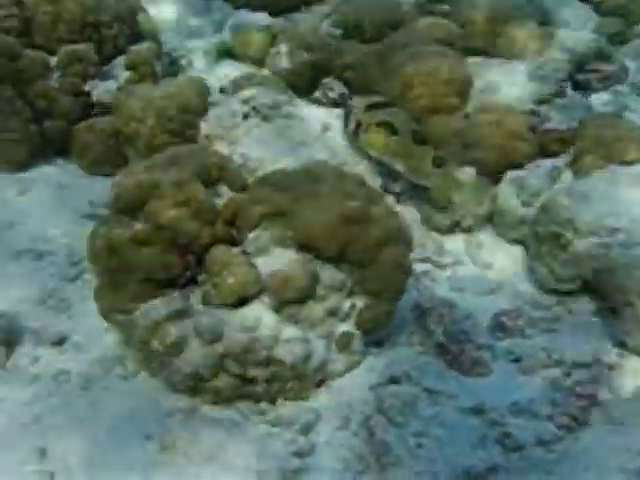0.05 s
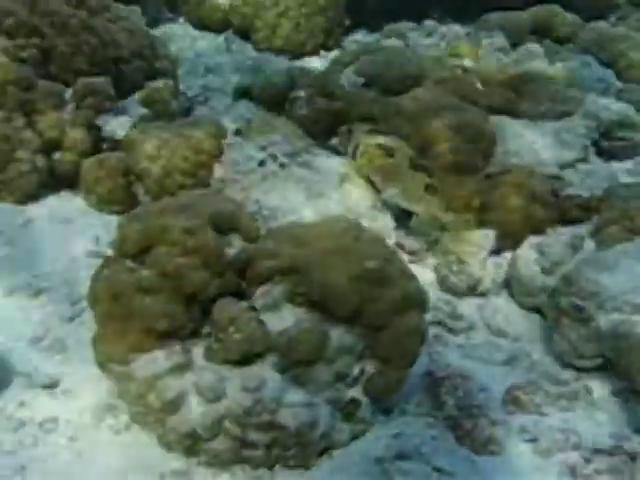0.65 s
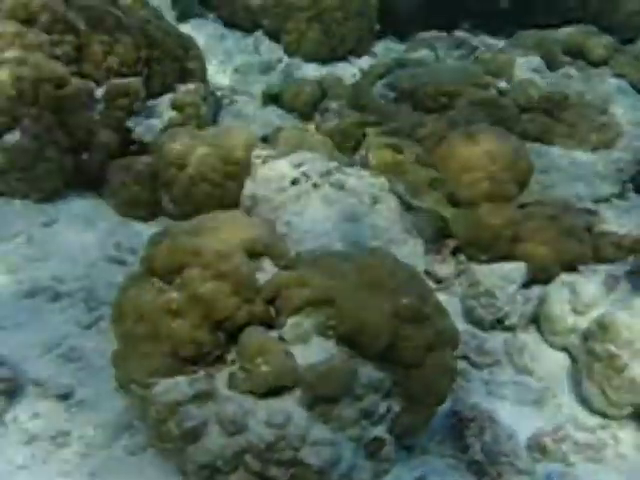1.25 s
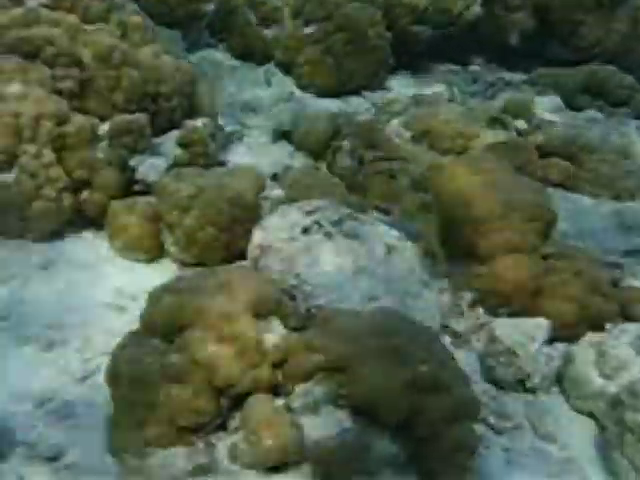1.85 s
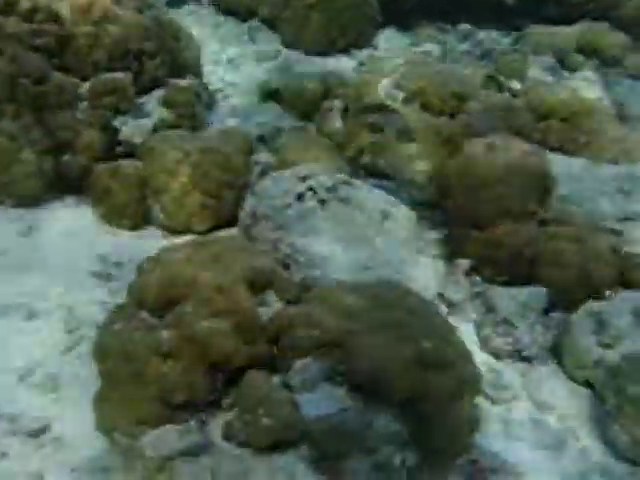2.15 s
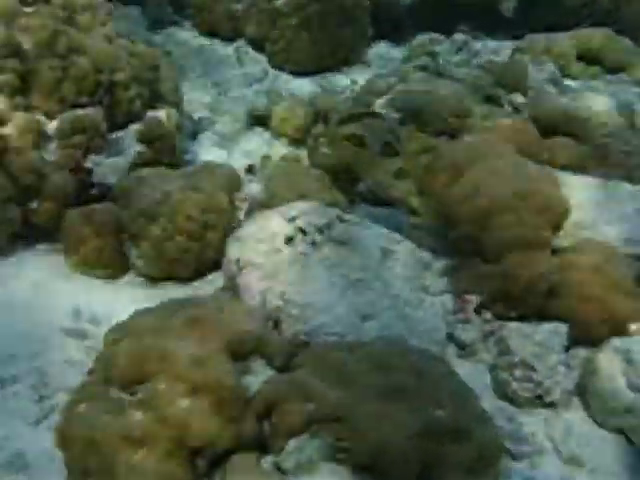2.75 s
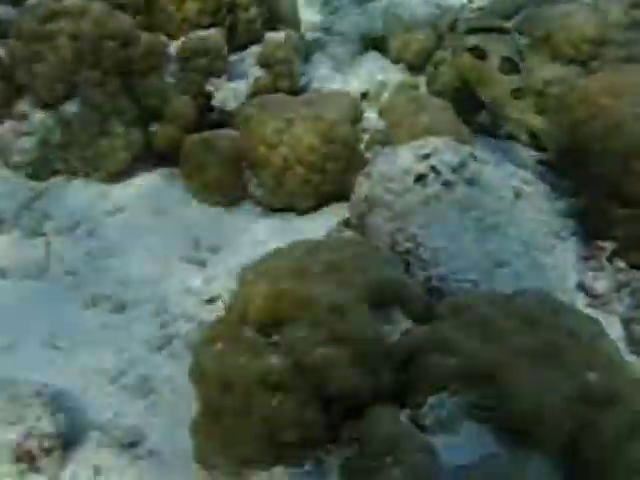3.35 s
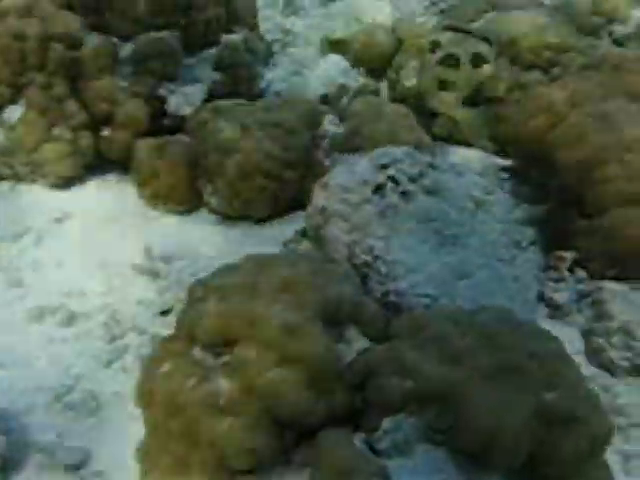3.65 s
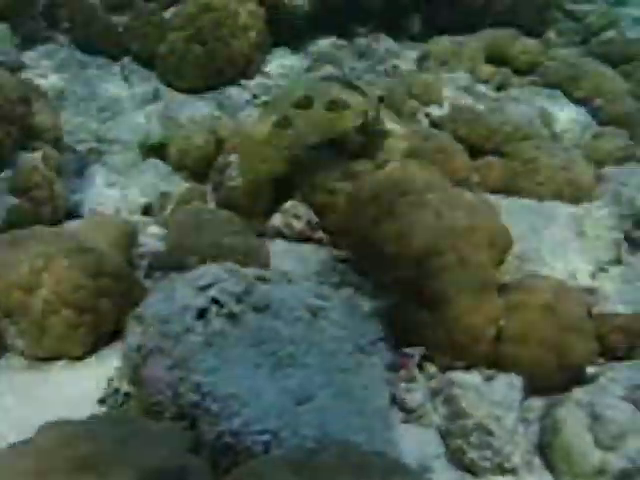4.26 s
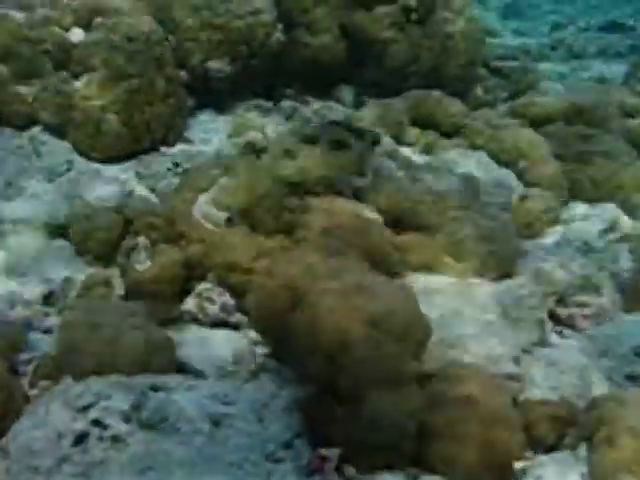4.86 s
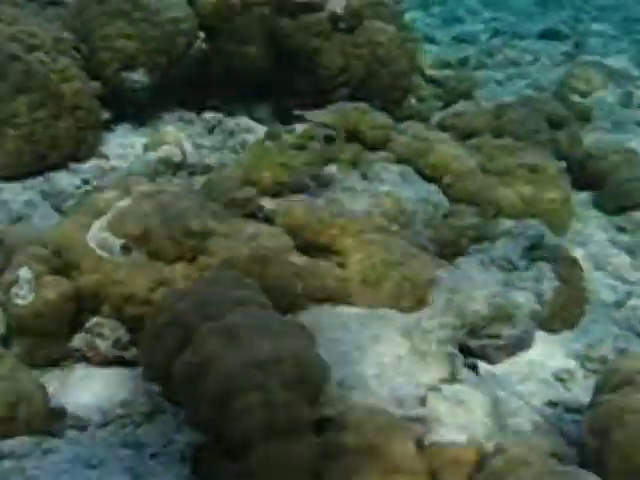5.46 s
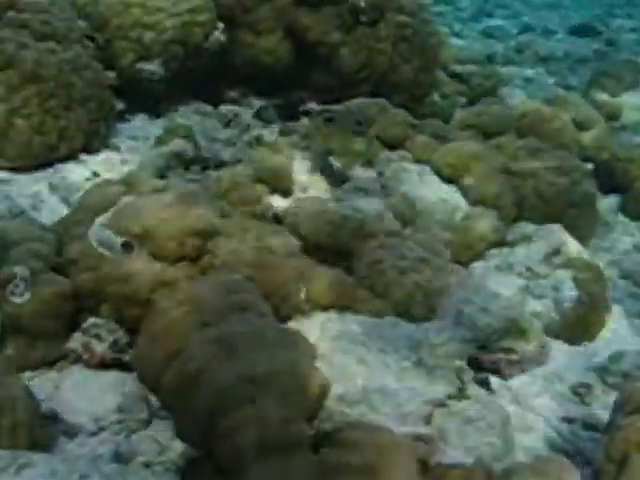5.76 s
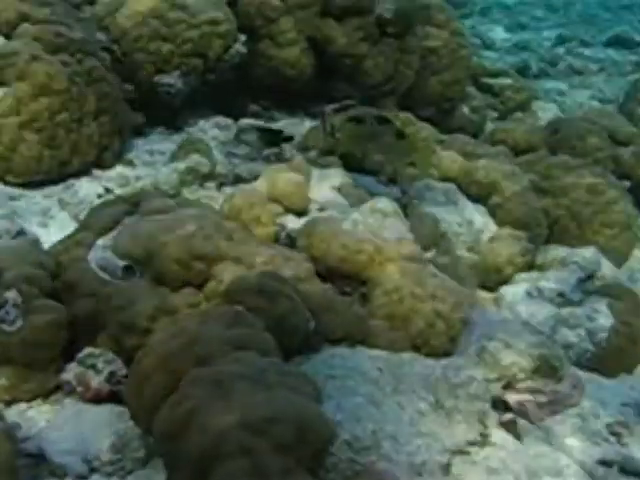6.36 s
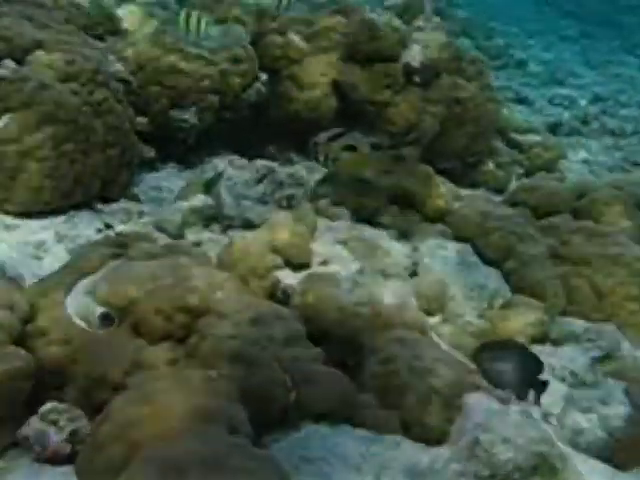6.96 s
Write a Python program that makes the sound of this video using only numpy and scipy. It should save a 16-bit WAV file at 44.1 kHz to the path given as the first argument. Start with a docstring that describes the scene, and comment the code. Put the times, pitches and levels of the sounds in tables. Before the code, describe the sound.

Muffled water washes past in slow swells over a deep rumble, heard from inside a camera housing drifting above a reef. Scattered shrimp snaps and faint bubble plinks dot the rush. About halfway, the case takes two dull knocks, followed by one crisp, louder snap and a few more ticks and bumps. The camera's own quiet hiss and whine continue throughout.

```python
"""A camera over a coral reef

A camera in a waterproof housing drifts through shallow water, in a low rush that swells and ebbs.
Soft contacts give the housing dull, damped bumps; hard ones tick and excite the modes of its shell.
Nearby, shrimp snap by cavitation and small bubbles plink at their resonant frequencies.
Inside the case the camera adds its own hiss and a thin electronic whine."""
import sys
import numpy as np
from scipy import signal
from scipy.fft import rfft, irfft, next_fast_len
from scipy.io import wavfile
from scipy.ndimage import map_coordinates

SR = 44100
rng = np.random.default_rng(int(sys.argv[2]) if len(sys.argv) > 2 else 0)


def waveform_to_disk(signal):
    """Save audio, clipped to [-1, 1], as 16-bit WAV at the path in sys.argv[1]."""
    frames = np.transpose(np.atleast_2d(signal))
    scaled = np.clip(frames, -1, 1) * 32767
    samples = np.round(scaled).astype(np.int16)
    wavfile.write(sys.argv[1], SR, samples)


N = 309141


def amp(db):
    """Amplitude ratio of a level in decibels."""
    return 10 ** (np.asarray(db) / 20)


def gain_at(spectrum, hz):
    """Amplitude response: (f/Hz, level/dB) points interpolated on a logarithmic frequency axis."""
    f, db = np.transpose(spectrum)
    return amp(np.interp(np.log(hz + 1), np.log(f), db))


def wobble(knots_per_s):
    """Smooth random modulation: a spline through Gaussian values."""
    knots = rng.standard_normal(int(N * knots_per_s / SR) + 4)
    return map_coordinates(knots, [np.arange(N) * knots_per_s / SR])


def filtered(x, response):
    """Linear filtering: the spectrum of x is multiplied by a frequency response."""
    size = next_fast_len(N + SR // 2)
    return irfft(rfft(x, size) * response(np.fft.rfftfreq(size, 1 / SR)), size)[:N]


def noise(spectrum):
    """Spectral shaping of white noise, scaled to rms 1."""
    x = filtered(rng.standard_normal(N), lambda hz: gain_at(spectrum, hz))
    return x / np.sqrt(np.mean(x ** 2) + 1e-20)


def minimum_phase(spectrum, size=1024):
    """Folding the cepstrum gives a causal impulse response, scaled to energy 1."""
    cepstrum = irfft(np.log(gain_at(spectrum, np.fft.rfftfreq(size, 1 / SR))))
    cepstrum[1:size // 2] *= 2
    cepstrum[size // 2 + 1:] = 0
    response = irfft(np.exp(rfft(cepstrum)))
    return response / np.linalg.norm(response)


def envelope(t60, attack):
    """Exponential decay by 60 dB in t60 seconds, after a rise with time constant attack."""
    t = np.arange(SR // 4) / SR
    return np.exp(-np.log(1000) * t / t60) * (1 - np.exp(-t / attack))


def ring(hz, t60, attack):
    """Free vibration of one damped mode."""
    shape = envelope(t60, attack)
    return shape * np.sin(2 * np.pi * hz * np.arange(len(shape)) / SR)


def burst(t60, attack):
    """A broadband transient of decaying white noise."""
    shape = envelope(t60, attack)
    return shape * rng.standard_normal(len(shape))


def add(track, start_s, sound):
    """Superpose a sound on a track."""
    part = track[round(start_s * SR):][:len(sound)]
    part += sound[:len(part)]


# Microphone hiss spectrum: f/Hz, relative level/dB
HISS_SPECTRUM = [(200, 1), (1000, 1), (2200, -0.5), (3200, -2.5), (4200, -4), (5600, -8), (7000, -11),
                 (8300, -21), (9700, -27.5), (11000, -52), (12800, -34), (14500, -26.5), (15800, -27)]
# Circuit tones: f/Hz, rms level/dB
WHINE_TONES = [(1822.8, -55.3), (3645.7, -65), (4829.2, -62), (6195, -66.7), (7378, -79), (9201, -83),
               (12847, -89.5), (14670, -90)]
def electronics():
    """Self-noise: steady tones from the camera's circuits over an even broadband hiss."""
    t = np.arange(N) / SR
    whine = sum(amp(db) * np.sqrt(2) * np.sin(2 * np.pi * (hz * t + rng.random()))
                for hz, db in WHINE_TONES)
    return whine + amp(-52.5) * noise(HISS_SPECTRUM)


# Spectrum of the calm water: f/Hz, relative level/dB
WASH_SPECTRUM = [(20, 0.5), (60, 2.5), (130, -4), (200, -3), (320, -9.5), (470, -8.5), (640, -18),
                 (1300, -23), (2400, -56.5)]
def wash():
    """Ambient noise: a nearly steady wash of water, heard between the swells."""
    return amp(-48.5 + 1.1 * wobble(8)) * noise(WASH_SPECTRUM)


# Spectrum of the surge: f/Hz, relative level/dB
SURGE_SPECTRUM = [(8, 0.5), (22, 1), (36, -1.5), (70, -12), (140, -20), (400, -83)]
# Strength of the surge: t/s, relative level/dB
SURGE_LEVELS = [(0.0, -49.5), (0.9, -44), (1.56, -52), (1.97, -43), (2.98, -51), (3.22, -40), (3.65, -48.5),
                (4.03, -39.5), (4.95, -48.5), (5.52, -41), (5.91, -48), (6.34, -42), (6.61, -50),
                (7.0, -46.5)]
def surge():
    """Pressure fluctuation: the slow surge bears on the case as a deep rumble."""
    level_db = np.interp(np.arange(N) / SR, *np.transpose(SURGE_LEVELS))
    return amp(level_db + 5 + 1.3 * wobble(6.8)) * noise(SURGE_SPECTRUM)


# Spectrum of the flow along the housing: f/Hz, relative level/dB
RUSH_SPECTRUM = [(20, -17), (60, -8), (130, -2), (205, 7.5), (320, -5.5), (480, 2.5), (570, -19.5),
                 (760, -21.5), (950, -13), (1150, -23), (1500, -16.5), (2400, -58)]
# Swells of water: onset t/s, level/dB, hold/s
WATER_SWELLS = [(-.25, -38.5, 0.22), (1.817, -40, 0.44), (3.866, -41.5, 0.67), (6.372, -43.5, 0.46)]
def rush(rise_s=0.18, ebb_db_per_s=10.5):
    """Flow noise: eddies along the case make a hollow rush that builds quickly, holds and ebbs slowly."""
    t = np.arange(N) / SR
    swells = np.zeros(N)
    for start, db, hold in WATER_SWELLS:
        rise = np.clip((t - start) / rise_s, 0, 1)
        ebb_s = np.maximum(t - start - rise_s - hold, 0)
        swells += rise * amp(db - ebb_db_per_s * ebb_s)
    flutter = amp(1.24 * wobble(3.35) + 0.72 * wobble(16))
    return swells * flutter * noise(RUSH_SPECTRUM)


# Small bubbles: t/s, relative level/dB, f/Hz
BUBBLE_PLINKS = [(0.77, -35.5, 1280), (.917, -42, 2370), (0.927, -41, 3340), (1.578, -39.5, 1340),
                 (1.603, -37.5, 936), (3.063, -40, 1700), (3.201, -34.5, 1250), (3.263, -40, 1260),
                 (5.064, -39, 1680)]
def bubbles():
    """Bubble resonance: each one rings briefly at a frequency set by its size."""
    out = np.zeros(N)
    for start, db, hz in BUBBLE_PLINKS:
        add(out, start, amp(db + 1) * ring(hz, t60=0.051, attack=0.0017))
    return out


# Near shrimp snaps: t/s, relative level/dB, cavity f/Hz
NEAR_SNAPS = [(0.686, -31, 5500), (.929, -30.5, 7800), (1.335, -27.5, 3530), (2.848, -31.5, 4300),
              (2.931, -38, 3700), (4.017, -28.5, 3560), (4.340, -27.5, 4280), (4.883, -32, 4050),
              (5.557, -12.5, 5370), (5.559, -20.5, 3150)]
# Colour of a snap heard through the case: f/Hz, relative level/dB
SNAP_SPECTRUM = [(300, -26), (1500, -2), (2500, 4), (3200, 9), (4200, -6), (5500, 2), (7000, -11.5),
                 (7900, -8), (10000, -40), (12500, -31), (14200, -15), (16000, -22)]
def shrimp(far_count=60, echo_s=0.011, echo_db=-14.5):
    """Cavitation: each claw's cavity collapses at a pitch set by its size; the reef returns an echo."""
    out = np.zeros(N)
    far_snaps = [(when * N / SR, -51 + 12 * nearness, 3000 + 3000 * pitch)
                 for when, nearness, pitch in rng.random((far_count, 3))]
    for start, db, hz in NEAR_SNAPS + far_snaps:
        crack = burst(t60=0.011, attack=0.00019)
        cavity = signal.lfilter(*signal.iirpeak(hz, Q=3.5, fs=SR), crack)
        snap = amp(db - 4.5) * (cavity + amp(-6.5) * crack)
        add(out, start, snap)
        add(out, start + echo_s, amp(echo_db) * snap)
    return signal.fftconvolve(out, minimum_phase(SNAP_SPECTRUM))[:N]


def rattle(hz):
    """Band-limited random vibration: a brief, rough shiver of the case around one pitch."""
    band = signal.butter(2, [hz / 1.47, hz * 1.15], "band", fs=SR)
    return signal.lfilter(*band, burst(t60=0.1, attack=0.0048))


# Hard contacts: t/s, relative level/dB, spectral tilt/(dB per octave)
HARD_CONTACTS = [(1.333, -30.5, 0.5), (3.724, -29.5, -1), (3.951, -35, -2.5), (4.029, -25, -7.5),
                 (4.14, -35.5, -1.5), (4.956, -36.5, -1), (5.797, -33.5, -0.5), (5.828, -38.5, -3),
                 (5.847, -32.5, -4), (6.464, -24.5, -1), (6.819, -33.5, 0), (6.846, -30, -4.5)]
# Modes of the shell: f/Hz, relative level/dB, T60/s
SHELL_MODES = [(469, 5, 0.041), (580, -6.5, 0.046), (1030, -4, 0.028), (1246, -12.5, 0.11),
               (1611, -7, 0.097), (2374, -12.5, 0.026), (3164, -4.5, 0.028), (3690, -6, 0.012),
               (4100, -17, 0.018), (7300, -15, .015), (7920, -20, 0.025), (9470, -34, 0.061),
               (14300, -35, .018)]
# Crack of a hard contact: f/Hz, relative level/dB
CRACK_SPECTRUM = [(200, 3), (700, 1), (1500, -2), (4200, -5.5), (5500, -17.5), (8000, -16.5), (10500, -42),
                  (14500, -24), (16000, -34)]
def ticks(touch_lead_s=0.003, scatter_db=2.2):
    """Modal excitation: each contact excites the shell's modes, its own tilt making the high modes stronger or
    weaker. A rattle follows."""
    out = np.zeros(N)
    crack_response = minimum_phase(CRACK_SPECTRUM)
    # a lighter, brighter touch precedes each strike
    touches = [(start - touch_lead_s, db - 8, tilt + 1.5) for start, db, tilt in HARD_CONTACTS]
    for start, db, tilt in HARD_CONTACTS + touches:
        modes = 0
        for hz, mode_db, t60 in SHELL_MODES:
            polarity = rng.choice([-1, 1])
            gain = amp(mode_db + tilt * np.log2(hz / 1000) + rng.normal(0, scatter_db))
            modes += polarity * gain * ring(hz, t60, attack=0.0012)
        crack = signal.fftconvolve(burst(t60=0.012, attack=0.0013), crack_response)[:len(modes)]
        add(out, start, amp(db) * (modes + amp(6 + tilt) * crack))
    for start, db, tilt in HARD_CONTACTS:
        add(out, start + 0.012, amp(db + 9.5 - tilt) * rattle(hz=430))
    return out


# Soft contacts: t/s, relative level/dB, thud f/Hz, sway level/dB re thud
SOFT_CONTACTS = [(0.474, -23.5, 44.7, 9), (0.963, -21.5, 129, -21), (1.191, -24, 194, -18),
                 (1.662, -23, 145, -24), (1.85, -19.5, 300, -17), (3.245, -7, 74, -0.5),
                 (3.245, -13.5, 135, -10), (3.258, -13, 129, 0), (3.92, -21, 132, 4), (3.982, -21, 226, -5),
                 (4.028, -8.5, 253, -4), (4.029, -9.5, 510, -20), (4.191, -22.5, 130, 9),
                 (5.616, -24, 64, -13), (6.221, -15, 277, -22)]
def bumps(decay_cycles=4.57):
    """Damped vibration: water stills each thud in a few cycles, and the whole case sways after it."""
    out = np.zeros(N)
    for start, db, hz, sway_db in SOFT_CONTACTS:
        thud = ring(hz, t60=decay_cycles / hz, attack=0.0008)
        sway = ring(hz=24, t60=0.15, attack=0.029)
        # a shorter contact also shakes the case at higher frequencies
        lowpass = signal.butter(4, 1.77 * hz, fs=SR)
        scuff = signal.lfilter(*lowpass, burst(t60=0.029, attack=0.00071))
        scuff /= np.abs(scuff).max()
        add(out, start, amp(db + 2.5) * (thud + amp(sway_db) * sway + amp(-12.5) * scuff))
    return out


def scene():
    """Superposition: all sources sum at one microphone inside the housing."""
    water = rush() + wash() + surge()
    return (water + electronics() + bumps() + ticks() + shrimp() + bubbles())[None]


def record(dry):
    """Band limiting: the camera passes nothing above its cutoff and adds a small negative DC offset."""
    cutoff_hz, dc_offset = 15750, -0.03
    return filtered(dry[0], lambda hz: hz < cutoff_hz)[None] + dc_offset


dry = scene()
out = record(dry)
waveform_to_disk(out)
```